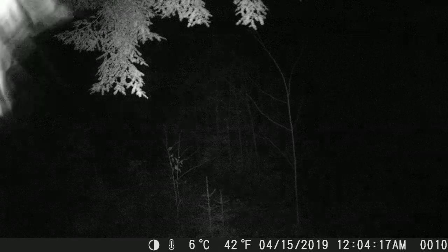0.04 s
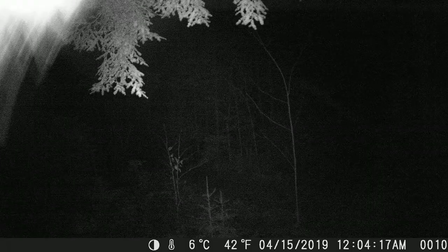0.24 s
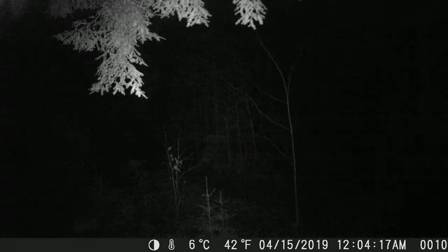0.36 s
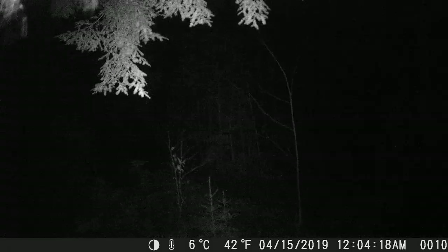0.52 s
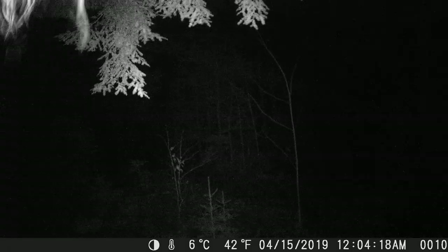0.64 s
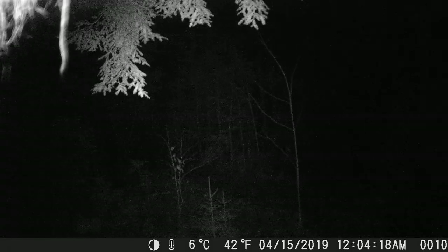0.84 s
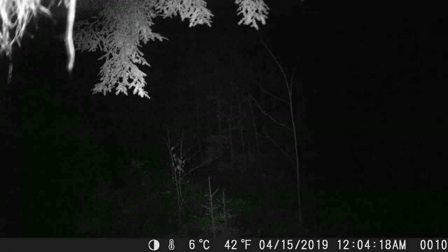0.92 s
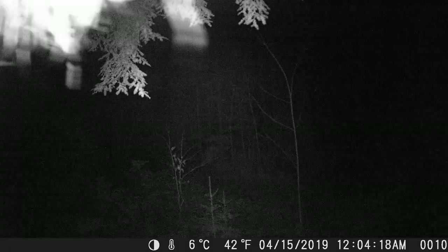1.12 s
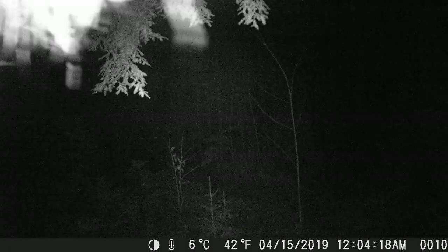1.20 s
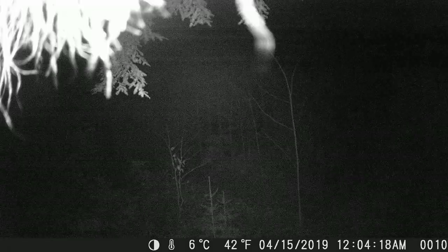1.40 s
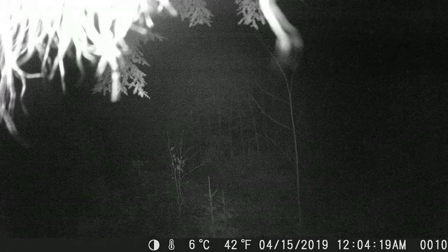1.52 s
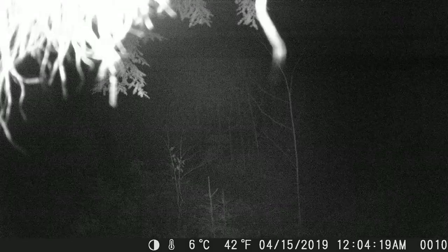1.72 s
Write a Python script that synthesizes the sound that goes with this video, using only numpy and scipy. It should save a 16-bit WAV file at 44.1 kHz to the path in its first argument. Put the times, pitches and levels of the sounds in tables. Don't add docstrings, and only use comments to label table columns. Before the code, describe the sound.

An animal's fur rasps very close against a plastic box strapped to a tree at night; claws scrape, a buckle knocks, a hard low thump rocks the box, then small ticks and quiet low rumble remain.

```python
import sys
import numpy as np
from scipy import signal
from scipy.io import wavfile
from scipy.ndimage import uniform_filter1d

SR = 44100
rng = np.random.default_rng(int(sys.argv[2]) if len(sys.argv) > 2 else 0)


def boost(x):
    u = np.asarray(x, float) / 20
    return 10 ** u


def generate_wav(signal):
    frames = np.transpose(np.atleast_2d(signal))
    scaled = np.clip(frames, -1, 1) * 32767
    pcm = np.round(scaled).astype(np.int16)
    wavfile.write(sys.argv[1], SR, pcm)


N = 77175

# pitch_hz, width_hz, level_db
BOX_MODES = [(567, 130, -5.5), (684, 174, -5.5), (1097, 470, 0.5), (1510, 262, 1), (2050, 350, -5.5),
             (2552, 407, -1.5), (3520, 570, -14), (4120, 540, -21), (5650, 1400, -25.5), (6823, 450, -18),
             (7760, 1100, -22), (347, 265, -9)]
# start_s, rasp_level_db, brightness_db_per_octave
FUR_PRESSURE = [(0, -53, 7.5), (.09, -55, 2.5), (.14, -50, 2), (.2, -49, 2.5), (0.278, -48, -2),
                (0.344, -51.5, -4), (.38, -58, 4), (.45, -65, 1.5), (0.561, -59.5, -1), (.65, -65, -1),
                (.75, -67, -2.5), (.86, -69, -2.1), (.97, -67, 0.6), (1.07, -61.5, -0.5), (1.16, -67, -1.5),
                (1.34, -65.5, 0), (1.42, -64.5, -0.2), (1.75, -68.5, -1.2)]
# start_s, peak_db, brightness_db_per_octave, length_s
HAIR_TICKS = [(0.011, -47.5, -5, 0.016), (0.03, -47.5, -12, 0.0046), (0.049, -54.5, -3.5, 0.0025),
              (0.064, -44, 10, 0.0034), (0.146, -38, 1, 0.0084), (0.399, -47, 4, 0.0095),
              (0.418, -43.5, 4.5, 0.0023), (0.457, -55, 3, 0.021), (0.531, -50, -2, 0.0042),
              (0.556, -48.5, -4.5, 0.0047), (0.623, -49.5, -5.5, 0.015), (0.682, -47.5, -4.5, 0.0083),
              (0.774, -50, -2, 0.0061), (0.884, -61.5, 8, 0.01), (0.989, -59.5, 12, 0.013),
              (1.186, -46, 0, 0.0061), (1.212, -54, -0.5, 0.013), (1.285, -52, 1, 0.0096),
              (1.373, -48, 0.5, 0.0094), (1.489, -52, 0.5, 0.012), (1.524, -59.5, 7, 0.011),
              (1.645, -90, -15, 0.0055), (1.706, -59.5, -3, 0.0064)]
# start_s, peak_db, pitch_hz, length_s
DRAGS = [(.005, -52, 2474, 0.022), (.06, -43, 2596, 0.098), (.115, -39, 2474, 0.067),
         (.205, -39, 1000, 0.054), (0.231, -32.5, 979, 0.024), (.243, -30.5, 1244, 0.019),
         (0.24, -45.5, 3440, .05), (0.257, -35.5, 2250, 0.023), (0.263, -29, 1466, 0.012),
         (0.275, -35, 1320, .01), (.285, -42, 1048, 0.054), (0.478, -48.5, 2550, .035),
         (0.483, -53.5, 3470, 0.036), (.57, -63.5, 3520, 0.036), (1.242, -53.5, 2050, 0.052),
         (1.464, -55.5, 1440, 0.021), (1.588, -61, 2380, 0.032)]
# start_s, peak_db, pitch_hz
BUCKLE_KNOCKS = [
    (0.099, -35, 670),
    (0.175, -38.5, 671),
    (0.267, -30.5, 747),
    (1.475, -54.5, 681),
]
# start_s, peak_db, pitch_hz
PANEL_PINGS = [(.2355, -25, 1085), (0.2358, -31, 913), (0.247, -27.5, 1127), (0.267, -27, 1084),
               (.401, -53, 3430), (.534, -59, 3570), (0.682, -54.5, 1415), (.775, -50, 2454),
               (1.189, -50, 1156), (1.188, -61, 3490), (1.21, -55, 1480), (1.3753, -49, 2640),
               (1.3757, -53, 1490), (1.524, -67, 1480), (1.645, -63, 1490)]
# start_s, peak_db, pitch_hz, hold_s
BOX_ROCKS = [(.035, -60, 120.6, .01), (0.058, -45.5, 97.2, 0.017), (0.121, -41, 124, 0.016),
             (0.165, -32, 82.6, 0.025), (0.216, -25.5, 121.7, 0.012), (0.238, -25, 91, 0.018),
             (0.2602, -22.5, 58.1, 0.022), (0.2639, -15, 86.4, .037), (0.316, -20.5, 91.6, .01),
             (0.349, -30.5, 63.8, 0.023), (1.38, -50, 84, 0.019), (1.417, -48.5, 70, 0.024),
             (1.49, -53, 70, 0.051)]
# start_s, peak_db, pitch_hz
BOX_LURCHES = [
    (0, -37.5, 112),
    (0.262, -35.5, 27),
    (0.492, -43, 25),
    (0.798, -50.5, 16),
    (0.988, -45, 19.4),
    (1.359, -40, 17.85),
    (1.6, -47, 30),
]
# pitch_hz, width_hz, level_db
MOUNT_MODES = [
    (20.9, 14, 1.5),
    (49.6, 42, -8),
    (70, 34, 1.5),
    (92.6, 29, -7.5),
    (128.8, 20.5, -3),
    (195.4, 33, -15),
]
# start_s, level_db
MOUNT_SHAKE = [
    (0.0, -44),
    (0.214, -44.5),
    (0.34, -43.5),
    (0.476, -57.5),
    (0.588, -53.5),
    (0.774, -59.5),
    (1.276, -58.5),
    (1.75, -63.5),
]


def unit(x):
    return x / np.sqrt(np.mean(x ** 2))


def ring(x, hz, width_hz):
    return signal.lfilter(*signal.iirpeak(hz, hz / width_hz, SR), x)


def ring_twice(x, hz, width_hz):
    return ring(ring(x, hz, width_hz), hz, width_hz)


def curve(table):
    times, values = np.array(table).T
    return np.interp(np.arange(N) / SR, times, values)


def walk(rate_hz):
    k = int(SR / rate_hz)
    steps = np.repeat(rng.standard_normal(N // k + 1), k)
    return 0.74 * uniform_filter1d(uniform_filter1d(steps, k), k)[:N]


def add(out, start_s, x, peak_db):
    i = int(start_s * SR)
    x = x[:N - i]
    out[i:i + len(x)] += x * boost(peak_db) / np.abs(x).max()


def puff(noise, length_s, rise_share):
    t = np.arange(len(noise)) / SR
    rise = np.minimum(t / (rise_share * length_s), 1)
    return noise * rise * np.exp(-2 * (t / length_s) ** 3)


def struck(hz, rise_s, t60_s):
    t = np.arange(N) / SR
    decay = np.exp(-np.log(1000) * t / t60_s)
    return (1 - np.exp(-t / rise_s)) * decay * np.sin(2 * np.pi * hz * t)


def box(x, tilt=0, flicker_db=0):
    out = 0
    skirt_db, tilt_top_hz = -5, 3900
    for k, (hz, width_hz, db) in enumerate(BOX_MODES):
        once = ring(x, hz, width_hz)
        level_db = db + tilt * np.log2(min(hz, tilt_top_hz) / 1500)
        if flicker_db:
            level_db = level_db + flicker_db * walk(40)
        gain = (-1) ** k * boost(level_db) * np.sqrt(300 / width_hz)
        out = out + gain * (ring(once, hz, width_hz) + boost(skirt_db) * once)
    return out


def fur():
    slips_per_s, slip_s, slip_spread_db = 300, 0.0022, 1
    smooth_rub_db, flicker_db = 2.6, 2.5
    rows = np.array(FUR_PRESSURE)
    press_db, tilt = curve(rows[:, [0, 1]]), curve(rows[:, [0, 2]])
    strength = boost(slip_spread_db * np.minimum(rng.exponential(size=N), 3))
    slips = (rng.random(N) < slips_per_s / SR) * strength
    grip = signal.lfilter([1], [1, -np.exp(-1 / (slip_s * SR))], slips)
    friction = (unit(grip) + boost(smooth_rub_db)) * rng.standard_normal(N)
    rub = box(friction, tilt, flicker_db)
    treble = signal.sosfilt(signal.butter(4, 5000, "high", fs=SR, output="sos"), rub)
    treble_gain = boost(0.15 * (press_db + 83.5)) - 1
    return (rub + treble * treble_gain) * boost(press_db) / np.median(np.abs(rub)) / 2


def ticks():
    out = np.zeros(N)
    noises = rng.standard_normal((len(HAIR_TICKS), 4096))
    for (start_s, db, tilt, length_s), noise in zip(HAIR_TICKS, noises):
        touch = puff(noise, length_s, 0.063)
        add(touch, 0, np.ones(2), 9)
        add(out, start_s, box(touch, tilt), db)
    return out


def scrapes():
    out = np.zeros(N)
    focus_db, focus_q, tilt = 4, 8.0, 1.2
    noises = rng.standard_normal((len(DRAGS), 8192))
    for (start_s, db, hz, length_s), noise in zip(DRAGS, noises):
        drag = puff(noise, length_s, 0.23)
        pitched = unit(ring_twice(drag, hz, hz / focus_q))
        add(out, start_s, unit(box(drag, tilt)) + boost(focus_db) * pitched, db)
    return out


def buckle():
    out = np.zeros(N)
    for start_s, db, hz in BUCKLE_KNOCKS:
        add(out, start_s, struck(hz, rise_s=0.0012, t60_s=0.04), db)
    for start_s, db, hz in PANEL_PINGS:
        add(out, start_s, struck(hz, rise_s=0.00029, t60_s=0.031), db)
    return out


def rocking():
    out = np.zeros(N)
    attack_s, release_s, rise_hz_per_s, overtone_db = 0.0042, 0.0054, 645, -17.5
    lead = 1500
    t = np.arange(-lead, 6000) / SR
    for start_s, db, hz, hold_s in BOX_ROCKS:
        phase = 2 * np.pi * (hz * t + rise_hz_per_s * t ** 2 / 2)
        swell = np.maximum(-t, 0) / attack_s
        fall = np.maximum(t - hold_s, 0) / release_s + 8 * np.maximum(t, 0)
        shape = uniform_filter1d(np.exp(-swell - fall), size=150)
        shape = shape * np.minimum(np.arange(len(t)) / 500, 1)
        overtone = boost(overtone_db) * shape * np.cos(2 * phase)
        add(out, start_s - lead / SR, shape * (np.sin(phase) - overtone), db)
    return out


def settling():
    out = np.zeros(N)
    for start_s, db, hz in BOX_LURCHES:
        add(out, start_s, struck(hz, rise_s=0.0067, t60_s=0.81), db)
    ringdown = struck(74.4, rise_s=0.0041, t60_s=0.94) * boost(3.7 * walk(26.9))
    add(out, 0.24, ringdown, -32.5)
    return out


def mount():
    shake_db = curve(MOUNT_SHAKE)
    modes = []
    for hz, width_hz, db in MOUNT_MODES:
        level = boost(db + 1.5 * walk(15))
        modes.append(level * unit(ring_twice(rng.standard_normal(N), hz, 1.58 * width_hz)))
    sway_db = -60.5 + 0.33 * (shake_db + 61.5)
    return unit(sum(modes[1:])) * boost(shake_db) + modes[0] * boost(sway_db)


def mount_hum():
    middle_s, span_s = 1.137, 0.14
    hum = boost(-60.5) * unit(ring(rng.standard_normal(N), 131.6, 4.2))
    return hum * np.exp(-((np.arange(N) / SR - middle_s) / span_s) ** 2)


def scene():
    contact = fur() + ticks() + scrapes() + buckle()
    for hz, width_hz in ((3170, 130), (6400, 400)):
        contact = signal.lfilter(*signal.iirnotch(hz, hz / width_hz, SR), contact)
    return (contact + rocking() + settling() + mount() + mount_hum())[None]


def roll_off(x):
    return signal.sosfilt(signal.butter(12, 9320, fs=SR, output="sos"), x)


def record(dry):
    hiss_db, hiss_hz, top_hz, floor_db = -78, 606, 8346, -97.5
    dull = signal.lfilter(*signal.butter(1, hiss_hz, fs=SR), rng.standard_normal(dry.shape))
    hiss = boost(hiss_db) * unit(dull)
    mix = signal.sosfilt(signal.cheby1(10, .5, top_hz, fs=SR, output="sos"), dry + hiss)
    mix = mix + boost(floor_db) * rng.standard_normal(dry.shape)
    return roll_off(mix)


dry = scene()
out = record(dry)
generate_wav(out)
```